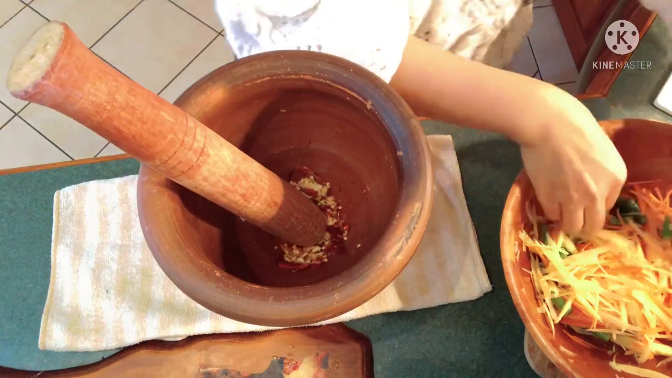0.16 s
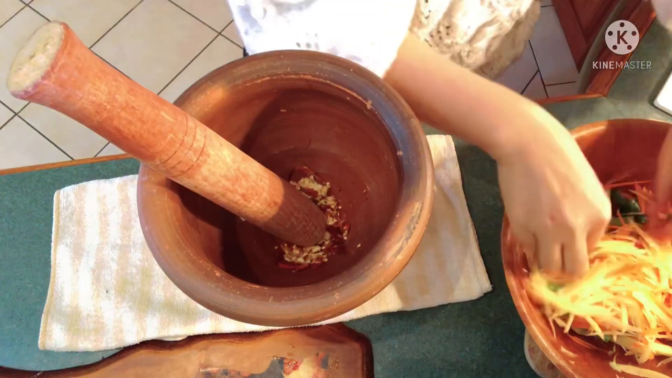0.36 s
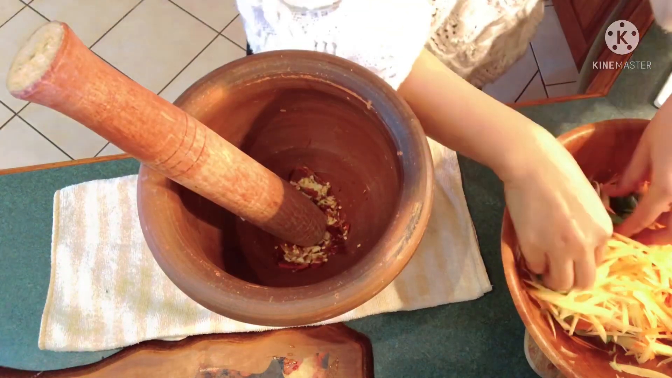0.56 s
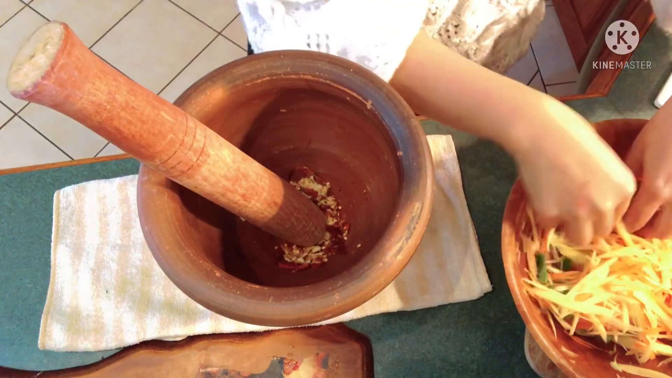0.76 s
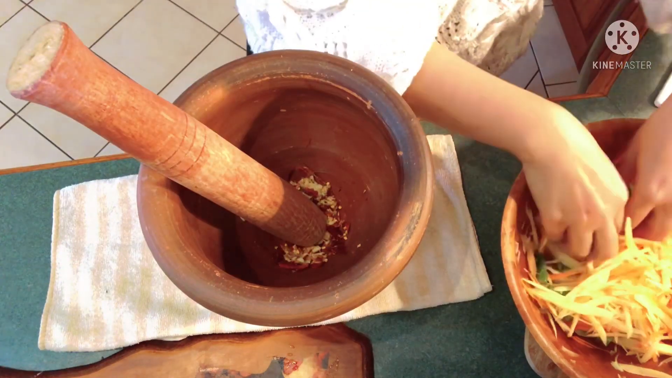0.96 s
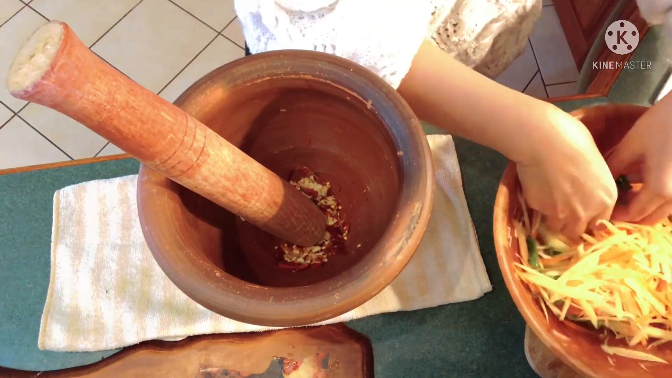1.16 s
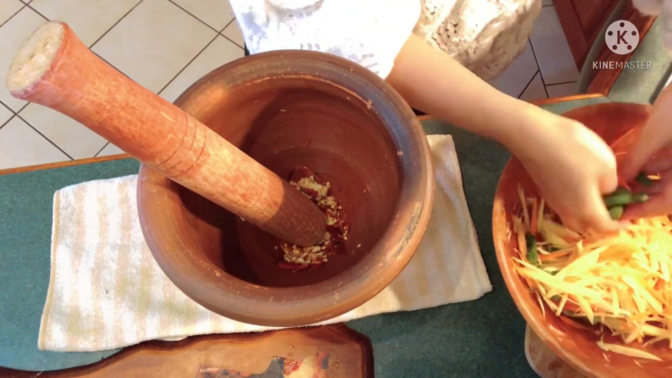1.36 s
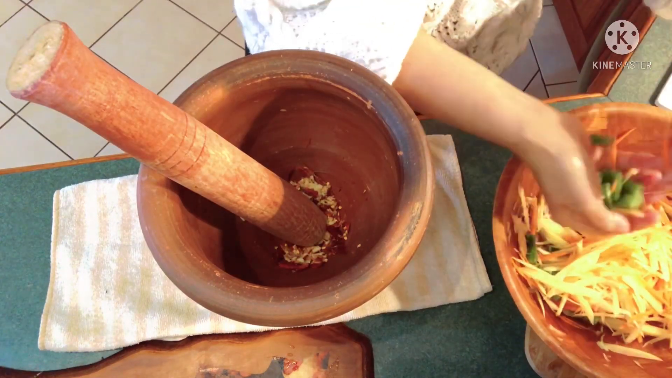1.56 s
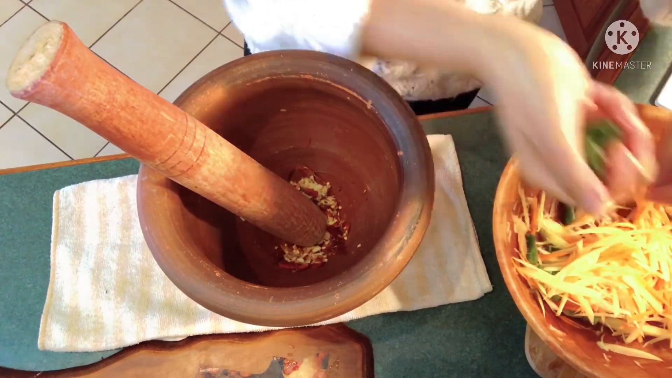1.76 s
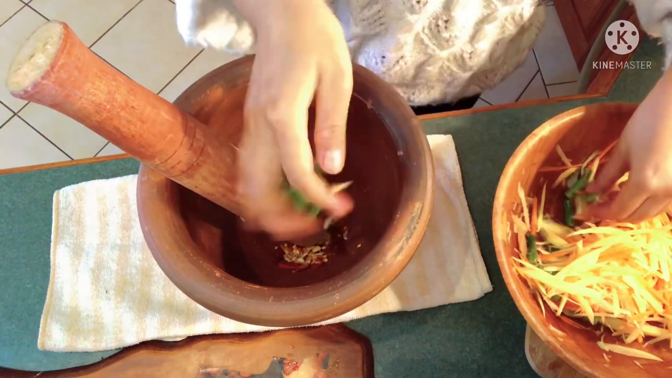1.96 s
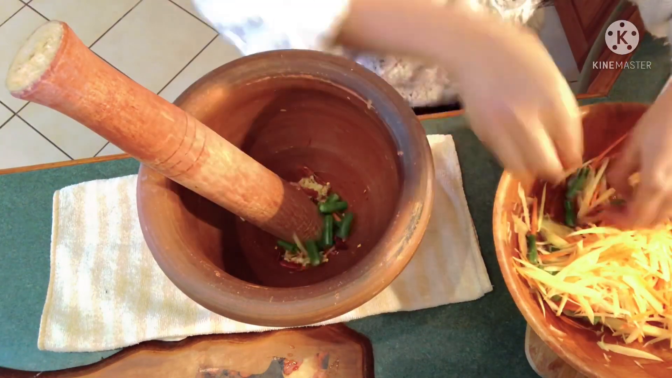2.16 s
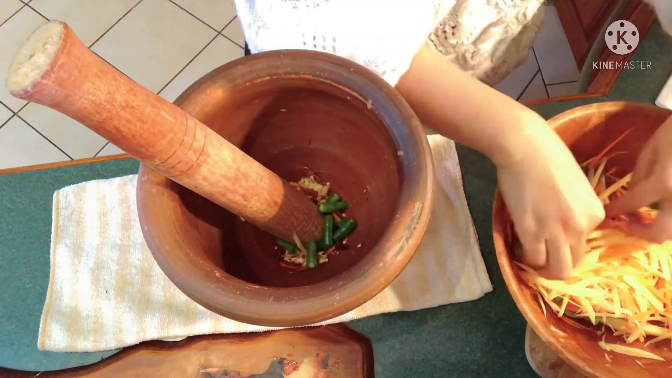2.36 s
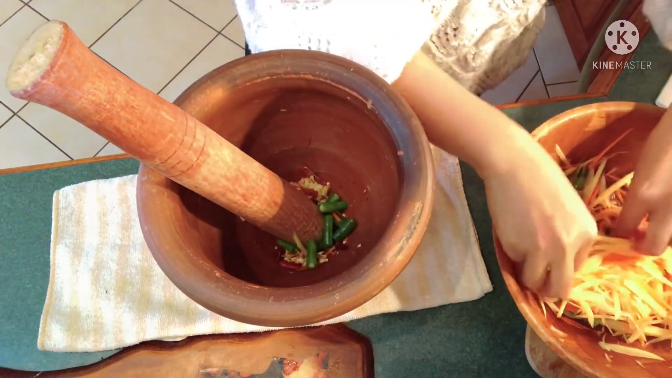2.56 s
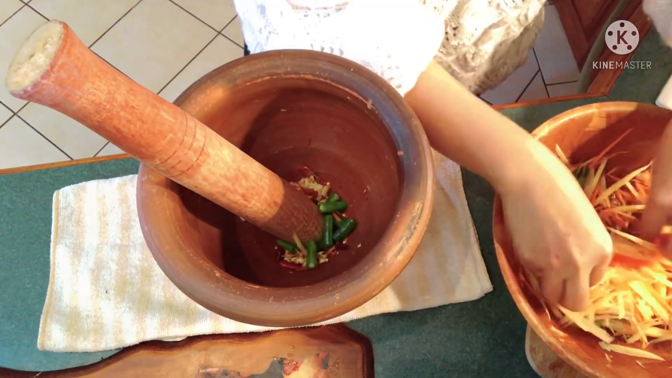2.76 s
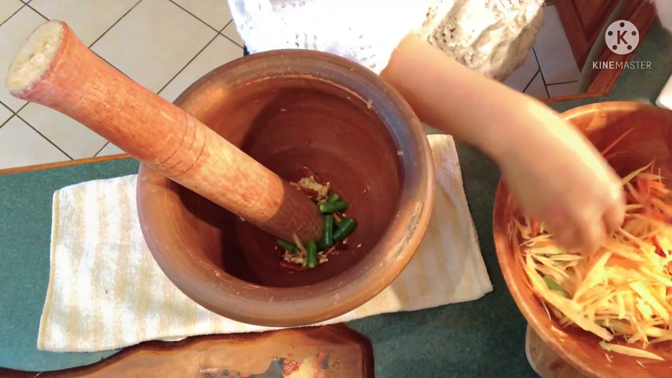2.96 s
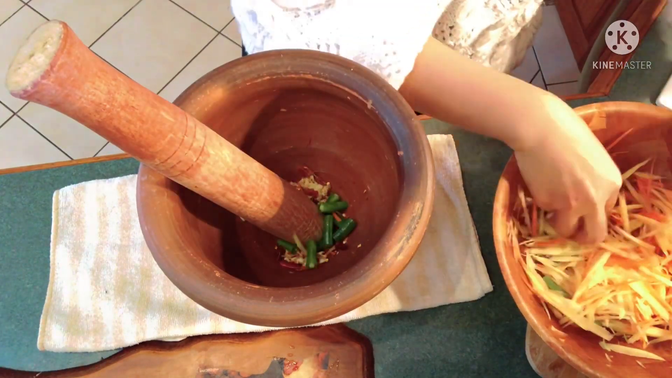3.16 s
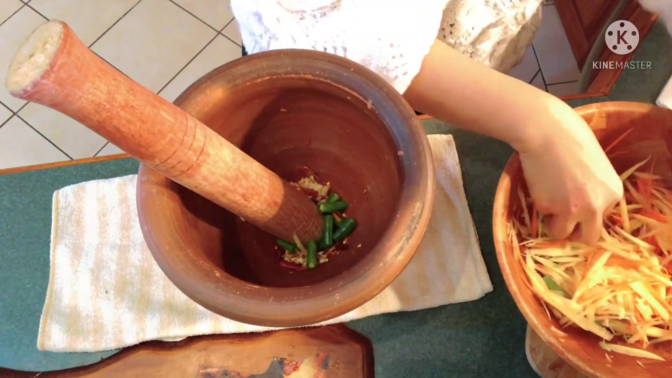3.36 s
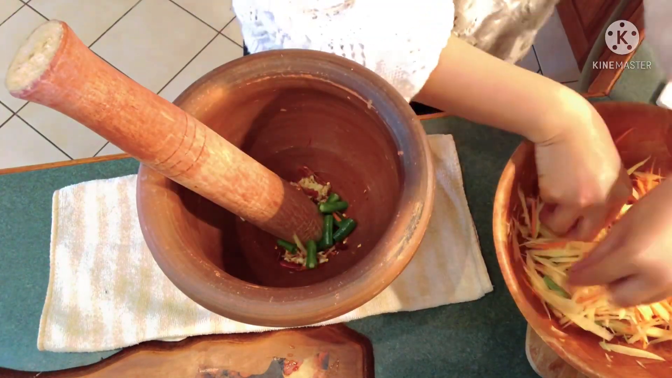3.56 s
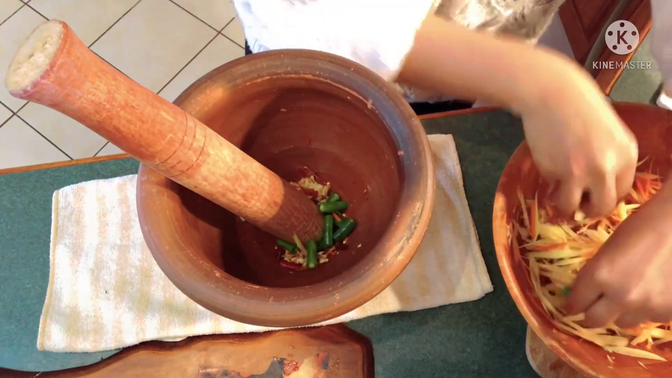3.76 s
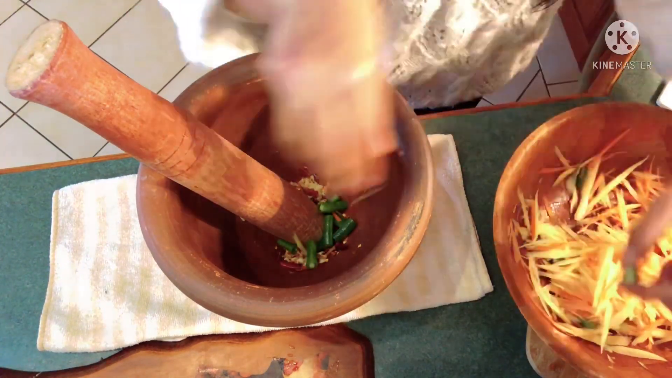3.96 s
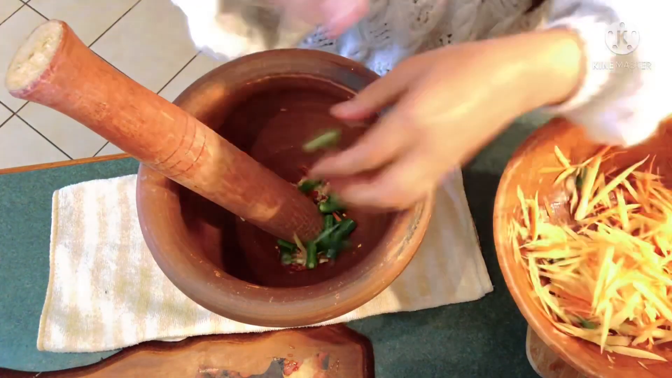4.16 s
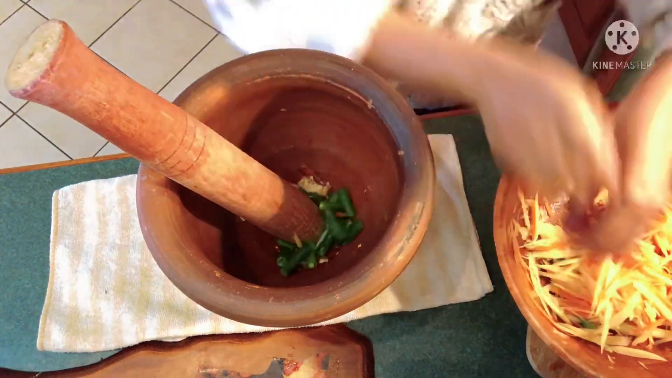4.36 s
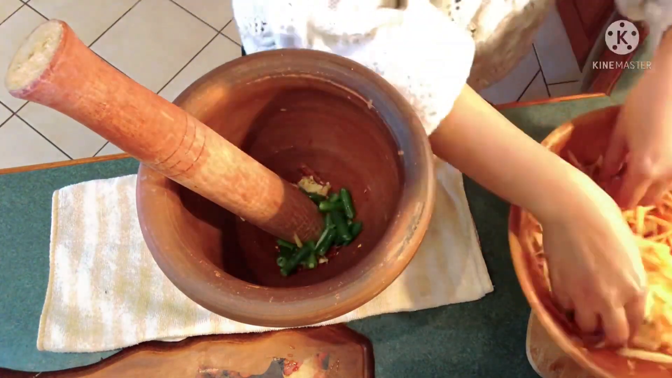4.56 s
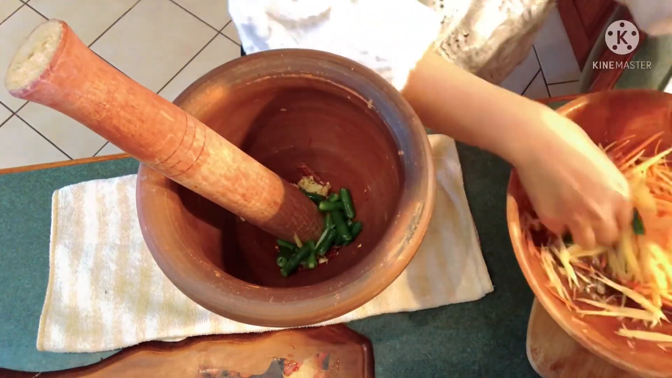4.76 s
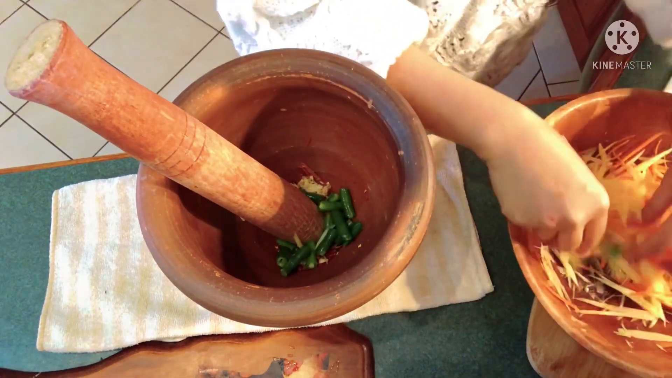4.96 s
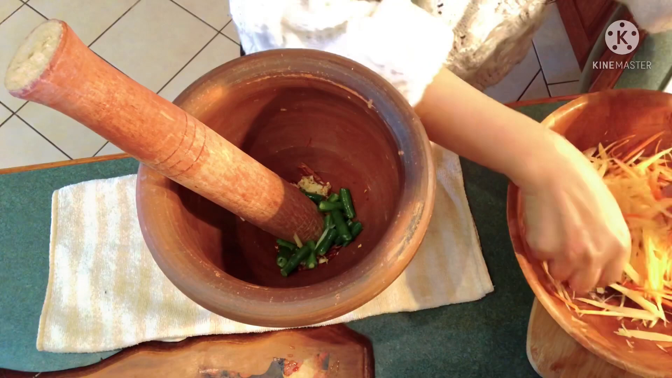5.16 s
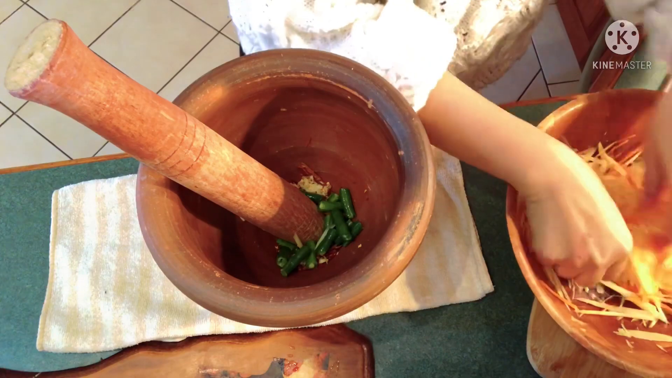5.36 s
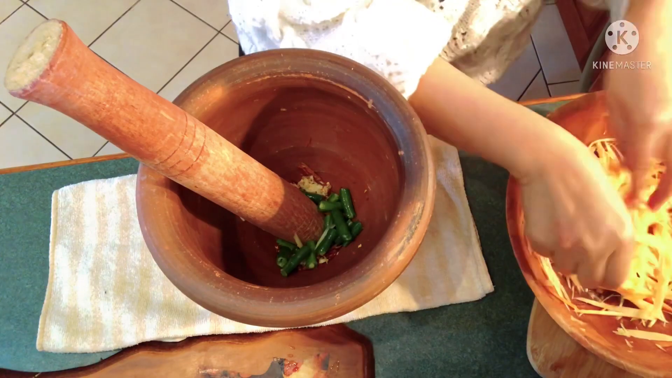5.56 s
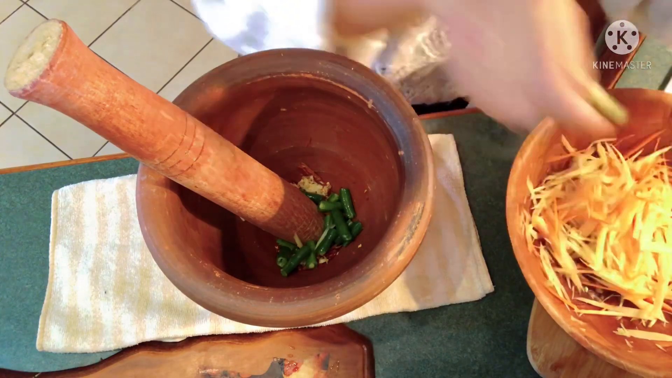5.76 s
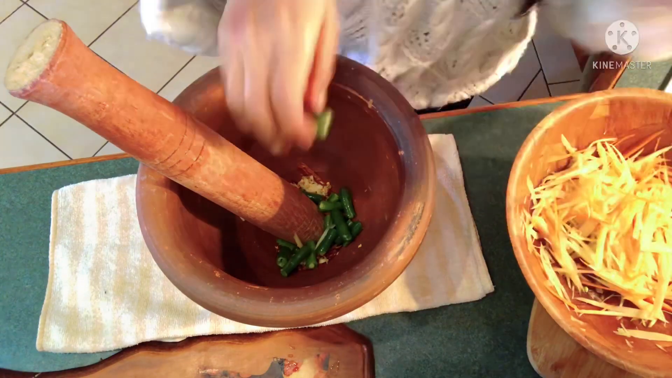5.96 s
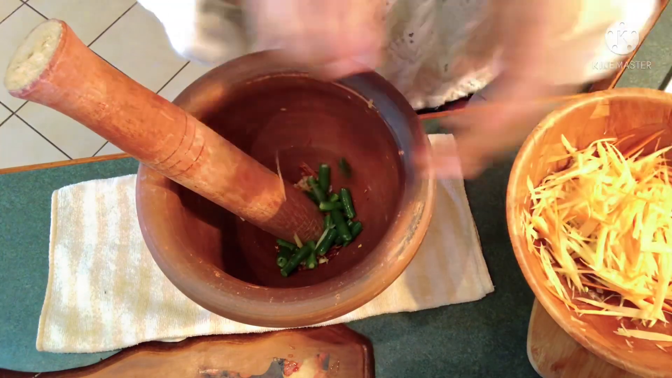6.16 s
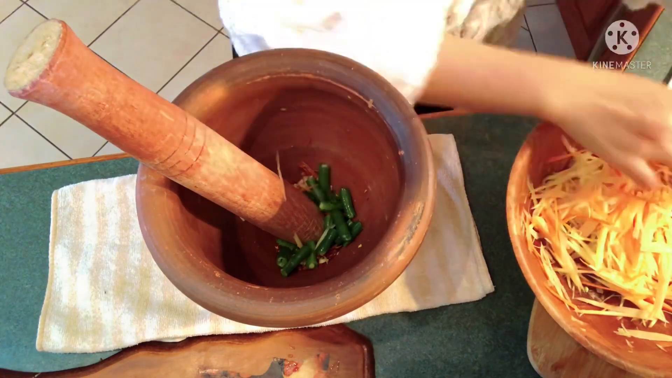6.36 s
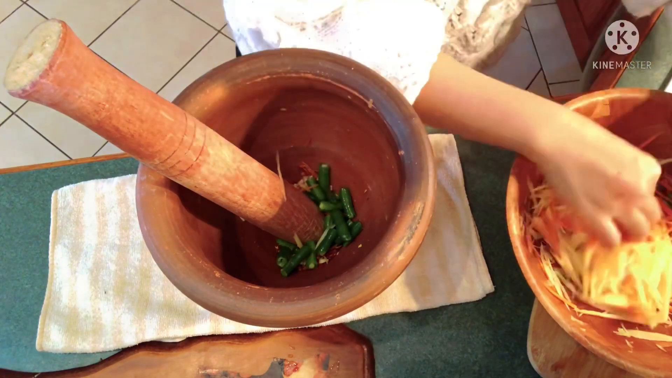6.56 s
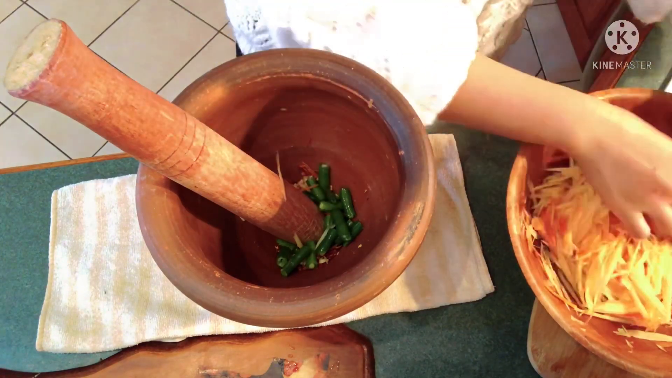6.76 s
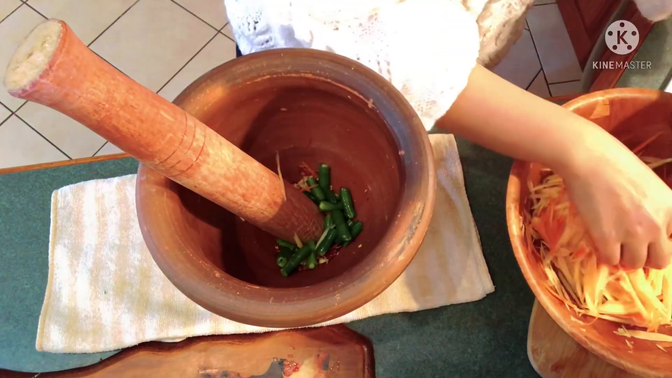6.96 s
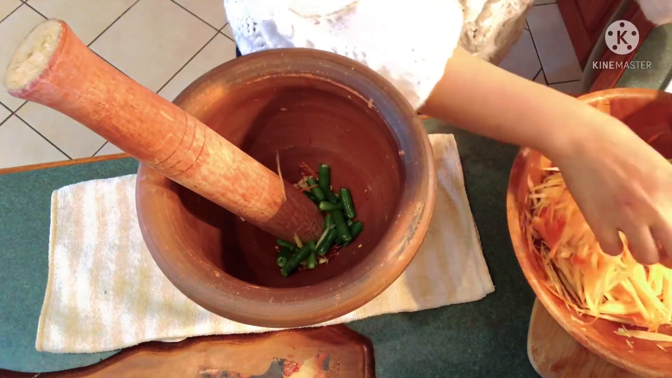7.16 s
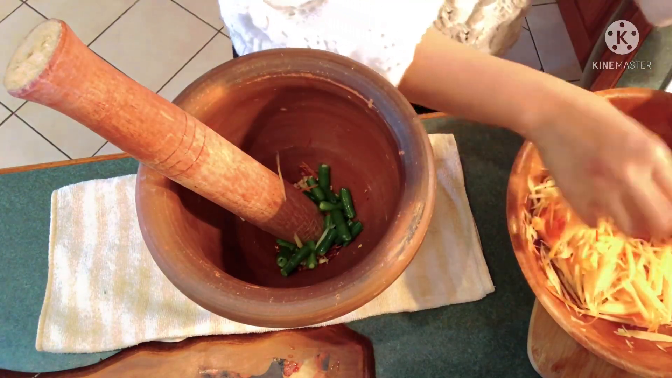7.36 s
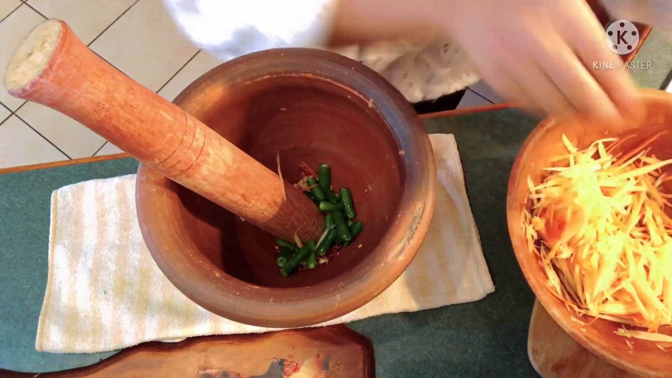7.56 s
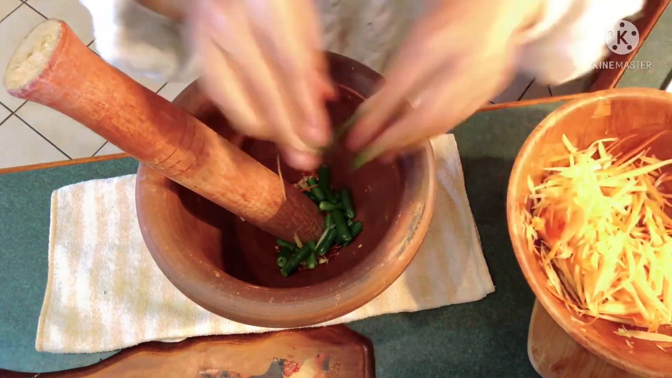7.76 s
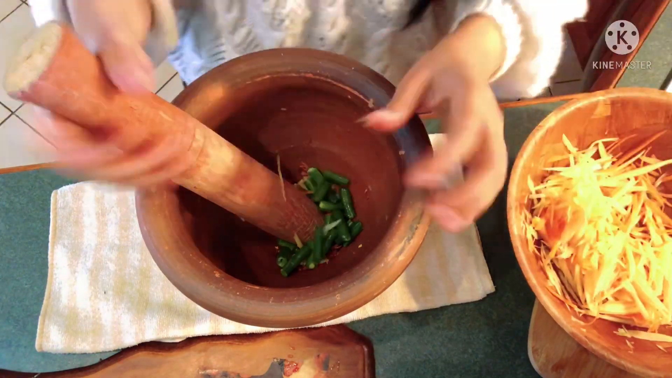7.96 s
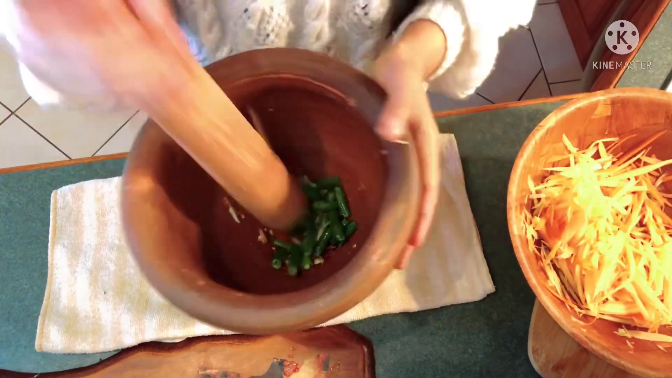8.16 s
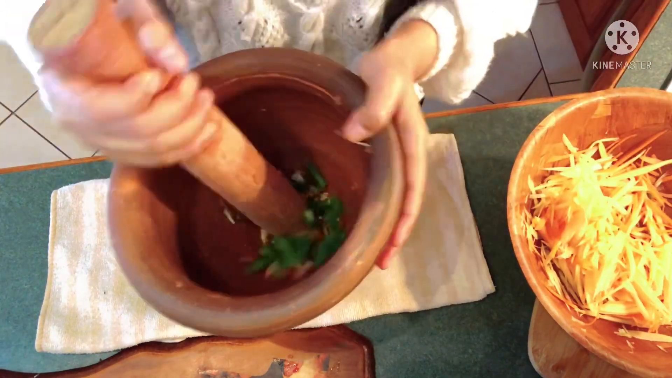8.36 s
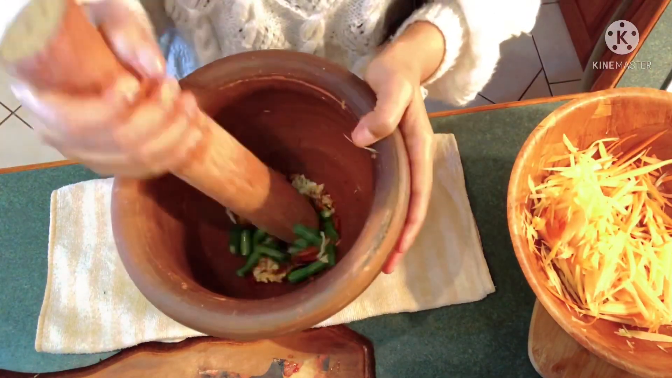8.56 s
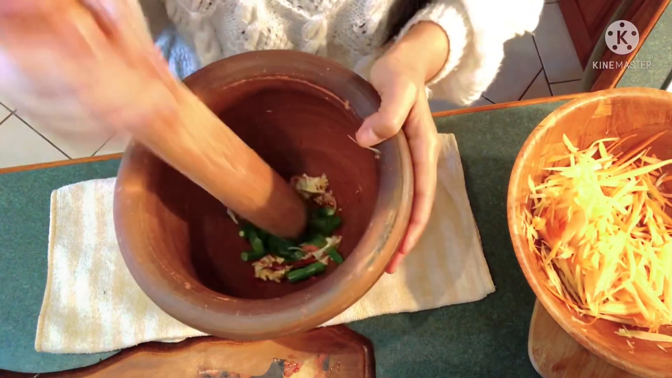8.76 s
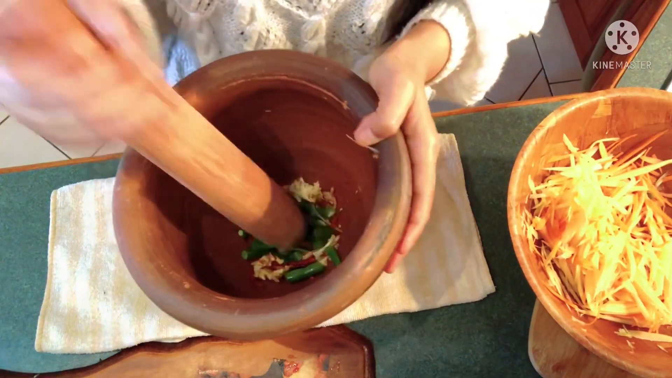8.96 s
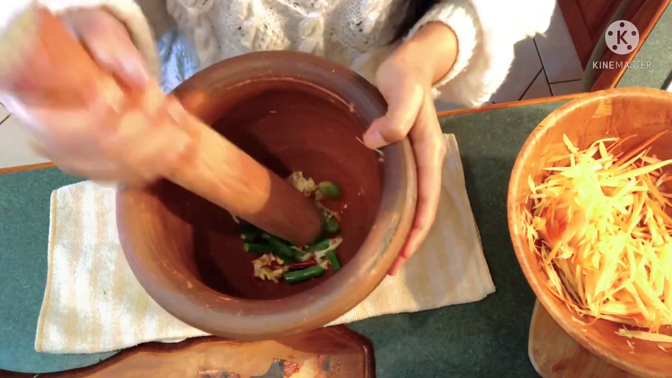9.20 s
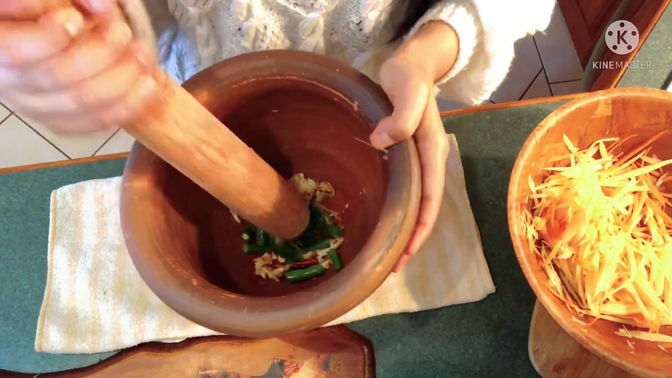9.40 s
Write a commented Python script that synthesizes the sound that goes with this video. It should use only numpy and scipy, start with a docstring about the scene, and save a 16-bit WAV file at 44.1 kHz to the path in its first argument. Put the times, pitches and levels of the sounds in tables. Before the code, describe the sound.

A quiet small kitchen, with faint rushing air, a low wavering appliance hum and a thin whine that fades out by 4 seconds. From the start, fingers rummage in a wooden bowl of wet shredded vegetables: a tiny squeak, fluttering hiss, little snaps, and woody knocks around 1 and 1.7 seconds. At about 2.1 a handful of beans patters into a clay mortar with sharp ticks and short pings. A dull bump follows at 2.35, then more rustling. More beans drop at 4.1 and 4.3; a strong bowl knock and boom come at 4.55. A sparse handful lands near 6.1, a soft deep bump at 7.0, and last pieces at 7.9. After a brief rub, from 8.27 to 9.38 a wooden pestle strikes eight times, about every 0.16 seconds: heavy low thuds, bright wet crunches, damped clay ringing and short room echoes, by far the loudest part.

```python
"""A wooden pestle pounds green beans in a clay mortar eight times: wet crunches of noise, a filtered thud
through the counter and ringing clay modes. Before that, hands rummage through shredded salad in a wooden
bowl (flickering, patchy noise, knocks and booms) and toss in handfuls of beans (noise snaps, clay modes).
A faint appliance hum, rushing air and the decaying echoes of a small kitchen surround it all."""
import sys
import numpy as np
from scipy import signal
from scipy.fft import rfft, irfft, next_fast_len
from scipy.io import wavfile
from scipy.ndimage import uniform_filter1d

SR = 44100
rng = np.random.default_rng(int(sys.argv[2]) if len(sys.argv) > 2 else 0)


def dump_mix(stems):
    """Bounce the given channels to the path in sys.argv[1] as a 16-bit WAV at rate SR."""
    frames = np.atleast_2d(stems).T  # one column per channel
    limited = np.clip(frames, -1, 1)  # hard clip at full scale
    pcm = np.round(limited * 32767).astype(np.int16)
    wavfile.write(sys.argv[1], SR, pcm)


N = 415863
T = np.arange(N) / SR
RING_T = np.arange(SR // 2) / SR


def amp(db):
    """Decibels to gain."""
    return 10 ** (np.asarray(db) / 20)


def unit(x):
    """Scales to rms 1."""
    return x / np.sqrt(np.mean(x ** 2) + 1e-20)


def read(points, hz):
    """Reads a table on a logarithmic frequency axis."""
    point_hz, value = np.transpose(points)
    return np.interp(np.log(hz + 1), np.log(point_hz), value)


def add(mix, start_s, sound):
    """Adds a sound to the mix at its start time."""
    part = mix[max(round(start_s * SR), 0):][:len(sound)]
    part += sound[:len(part)]


def noise(spectrum, size, tilt=0):
    """Coloured noise of rms 1, tilted in dB per octave."""
    hz = np.fft.rfftfreq(size, 1 / SR)
    gain = amp(read(spectrum, hz) + tilt * np.log2(hz + 1))
    return unit(irfft(rfft(rng.standard_normal(size)) * gain, size))


def drift(per_s):
    """A random curve of rms 1 with this many new values a second."""
    knots = np.arange(0, T[-1] + 1, 1 / per_s)
    return unit(np.interp(T, knots, rng.standard_normal(len(knots))))


def push(spectrum, corner_hz, size=8192):
    """One causal pulse of peak 1; a softer contact has a lower corner."""
    hz = abs(np.fft.fftfreq(size, 1 / SR))
    log_gain = np.log(amp(read(spectrum, hz)) / np.hypot(1, (hz / corner_hz) ** 2))
    minimum_phase = np.exp(signal.hilbert(log_gain).conj())
    pulse = np.fft.ifft(minimum_phase).real[:size // 2]
    return pulse / abs(pulse).max()


def ring(modes, force, damping=1):
    """Dying modes, each driven as hard as the force spectrum says; damping shortens them all."""
    out = np.zeros(len(RING_T))
    detune = rng.uniform(.99, 1.01, len(modes))
    for (hz, db, t60), d in zip(modes, detune):
        fall = np.exp(-np.log(1000) * damping * RING_T / t60)
        out += amp(db + read(force, hz)) * fall * np.sin(2 * np.pi * hz * d * RING_T)
    return out


# Colour of the rushing air: freq_hz, relative_level_db
AIR_COLOUR = [(25, -48), (60, -16.5), (105, -1), (135, -10), (270, -11.5), (370, -12.5), (600, -17),
              (960, -21.5), (2050, -28), (4000, -35.5), (7000, -35.5), (11000, -36.5), (16000, -42.5)]
# Partials of the appliance hum: pitch_hz, rms_level_db
HUM_PARTIALS = [(107, -71), (156, -76.5), (205, -78.5), (361, -75), (414, -78)]


def appliance(whine_hz=786, whine_db=-78.5, whine_end_s=4):
    """A steady rush of air, a wavering hum, a whine that fades in its last second, a thin whistle."""
    hum = np.zeros(N)
    for hz, db in HUM_PARTIALS:
        hum += amp(db) * np.sqrt(2) * np.sin(2 * np.pi * hz * T + drift(8.3))
    whine = np.sqrt(2) * np.sin(2 * np.pi * whine_hz * T + .5 * drift(19))
    whine *= amp(whine_db) * np.clip(whine_end_s - T, 0, 1)
    whistle = np.sin(2 * np.pi * 6830 * T + 0.53 * drift(240))
    return amp(-64) * noise(AIR_COLOUR, N) + hum + whine + amp(-86.5) * whistle


def squeak(start_s=0, end_s=.085, pitch_hz=1387, level_db=-63):
    """A wet finger on the bowl sticks and slips: a short, unsteady tone."""
    arch = np.sin(np.pi * np.clip((T - start_s) / (end_s - start_s), 0, 1))
    return amp(level_db) * arch * np.sin(2 * np.pi * pitch_hz * T + .8 * drift(130))


# Fingers search through the salad: start_s, end_s, level_db
FINGER_SEARCHES = [(0, .2, -73.5), (0.602, 1.38, -72), (1.374, 1.8, -79.5), (2.44, 2.98, -73),
                   (3.203, 3.805, -73), (4.6, 4.85, -69), (6.401, 7.302, -77)]
# Longer slides: clumps pulled by hand, and from 8.03 s beans and pulp rubbed in the mortar:
# start_s, end_s, crisp_hiss_db, duller_rub_db
LONG_SLIDES = [(.19, .34, -61.5, -62.5), (.8, 1.07, -85, -72), (1.102, 1.224, -59, -65.5),
               (2.31, 2.39, -69, -58.5), (2.611, 2.82, -66, -66), (2.88, 2.99, -73.5, -80),
               (4.487, 4.681, -60, -61), (4.833, 4.932, -64.5, -82), (5.346, 5.43, -59, -61),
               (6.502, 6.595, -73, -72), (7.2, 7.304, -69.5, -72), (7.44, 7.675, -70.5, -79),
               (8.03, 8.26, -63, -70.5), (9.12, 9.23, -84, -61), (9.22, 9.345, -57, -82)]
FINGER_S, FINGER_SPREAD_DB = .075, 0.5  # spacing of overlapping finger strokes; spread of their levels
# Pulp is squeezed out at the blow and slides on after it; rubbing is relative to the thud
SQUASH_S, SQUASH_RUB_DB = 0.034, -35
GRIND_S, GRIND_RUB_DB = 0.2, -48
PULP_HISS_DB = -66


def slides(bean_rub_db=-2):
    """Every slide of wet vegetable, by fingers, handful or pestle: rows like those of LONG_SLIDES."""
    rows = LONG_SLIDES + [(start, end, db, db + bean_rub_db) for start, end, db in HANDFULS]
    for s, thud_db, _ in PESTLE_STROKES:
        rows.append((s, s + GRIND_S, PULP_HISS_DB, thud_db + GRIND_RUB_DB))
        rows.append((s, s + SQUASH_S, PULP_HISS_DB, thud_db + SQUASH_RUB_DB))
    for start, end, db in FINGER_SEARCHES:
        for s in np.arange(start, end - FINGER_S, FINGER_S):
            stroke_db = db + FINGER_SPREAD_DB * rng.standard_normal()
            stroke_end = s + FINGER_S * rng.uniform(0.91, 1.58)
            rows.append((s, stroke_end, stroke_db, stroke_db))
    return rows


def patchy(x, patchy_db):
    """Each strip has its own colour, so the spectrum shifts in small patches."""
    z = signal.stft(x, SR, nperseg=256)[2]
    patches = uniform_filter1d(rng.standard_normal(z.shape), size=7, axis=0)  # across frequency
    patches = unit(uniform_filter1d(patches, size=12, axis=1))  # across time
    return unit(signal.istft(z * amp(patchy_db * patches), SR, nperseg=256)[1][:N])


# Colour of a small contact snap: freq_hz, relative_level_db
SNAP_COLOUR = [(400, -18.5), (1500, 6), (3500, -5.5), (7000, 5), (12000, 7), (16000, -4)]


def snap(decay_s, tilt, size=1024):
    """A tiny burst of contact noise."""
    return noise(SNAP_COLOUR, size, tilt) * np.exp(-RING_T[:size] / decay_s)


# Colour of the crisp hiss of sliding strips: freq_hz, relative_level_db
HISS_COLOUR = [(800, -30), (2500, -5.5), (4500, 1), (6500, 2.5), (8500, -3.5), (11000, -3), (15500, -12)]
# Colour of their duller rubbing: freq_hz, relative_level_db
RUB_COLOUR = [(150, -13), (600, -1), (1200, 4), (2000, 0), (3200, -7), (6000, -10), (12000, -23)]
# Single strips snap between the fingers: start_s, level_db
SINGLE_SNAPS = [(0.2315, -44.5), (0.6363, -51), (3.843, -48.5), (7.219, -48)]


def shreds():
    """Wet vegetable slides in clumps: fluttering patchy noise with a sprinkle of tiny snaps."""
    out = np.zeros(N)
    ticks = rng.random(N) < 1500 / SR  # about 1500 tiny snaps a second
    sizes = amp(2.6 * np.minimum(rng.exponential(1, N), 4)) * rng.standard_normal(N) * ticks
    grain = rng.standard_normal(N) + amp(-5) * unit(sizes)
    colour = amp(read(HISS_COLOUR, np.fft.rfftfreq(N, 1 / SR)))
    hiss = patchy(irfft(rfft(grain) * colour, N), patchy_db=4.0)
    rub = patchy(noise(RUB_COLOUR, N), patchy_db=5.0)
    flutter = amp(2.5 * drift(90))
    for start, end, hiss_db, rub_db in slides():
        span = slice(round(max(start, 0) * SR), round(end * SR))
        arch = np.sqrt(abs(np.sin(np.pi * (T[span] - start) / (end - start))))
        out[span] += arch * (amp(hiss_db) * hiss[span] + amp(rub_db) * rub[span])
    for s, db in SINGLE_SNAPS:
        add(out, s, amp(db) * snap(0.0015, tilt=-2.6))
    return out * flutter


# Colour of a solid contact: freq_hz, relative_level_db
CLACK_COLOUR = [(500, -16), (1100, 3), (1700, -0.5), (3400, 0.5), (5000, -2), (7000, -11.5), (9000, -19),
                (16000, -29)]


def clack(decay_s, size=1024):
    """The dull, very short knock of a solid contact."""
    return noise(CLACK_COLOUR, size) * np.exp(-RING_T[:size] / decay_s)


# Hands knock the salad bowl: start_s, tick_db, wood_ring_db, thump_db
BOWL_KNOCKS = [(0.8018, -61, -55.5, -68), (0.903, -72, -52.5, -69), (0.977, -40, -45, -68),
               (1.134, -52, -52, -62), (1.7282, -52, -43, -68), (1.7322, -46, -39, -74),
               (2.305, -58, -59, -45.5), (2.3563, -48, -56, -45), (2.3643, -51, -53, -35),
               (2.648, -44, -48.5, -48), (3.1413, -67, -48.5, -52), (3.1571, -56.5, -55.5, -54),
               (4.4971, -48, -44.5, -49), (4.5077, -44, -48, -44), (4.563, -29.5, -34, -33),
               (7.0127, -56, -61, -45)]
# Modes of the wooden bowl before damping: pitch_hz, relative_level_db, t60_s
BOWL_MODES = [(655, -53, 0.043), (914, -19, 0.18), (1218, 5, 0.017), (1420, -4, 0.018), (1646, -7.5, 0.018),
              (1980, -8, 0.016)]
# Colour of the bowl's thump before its contact corner: freq_hz, relative_level_db
THUMP_COLOUR = [(30, -40), (60, -21), (110, -9), (190, -4.5), (400, 12), (800, 1.5), (1600, 0), (4000, -85),
                (9000, -59)]


def bowl():
    """Knuckles tick on the wooden bowl, ring its modes and rock it against the counter with a thump."""
    out = np.zeros(N)
    for s, tick_db, wood_db, thump_db in BOWL_KNOCKS:
        add(out, s, amp(tick_db) * clack(0.0022))
        add(out, s, ring(BOWL_MODES, [(1180, wood_db)], damping=0.83))
        add(out, s, amp(thump_db) * push(THUMP_COLOUR, corner_hz=2300))
    return out


# Handfuls of beans slide into the mortar: start_s, end_s, sliding_db
HANDFULS = [(2.048, 2.175, -58.5), (4.093, 4.221, -68), (4.29, 4.43, -67.5), (6.12, 6.326, -83),
            (7.863, 7.94, -63)]
PATTER_PER_S, PATTER_SPREAD_DB = 80, 4
PATTER_SNAP_DB, PATTER_RING_DB = 8.5, -2.5  # relative to the sliding


def patter():
    """Light pieces of each handful land at random within it: rows like those of HEAVY_BEANS."""
    rows, gap_s = [], 1 / PATTER_PER_S
    offsets_db = np.array([PATTER_SNAP_DB, PATTER_RING_DB, PATTER_RING_DB])
    for start, end, db in HANDFULS:
        for s in np.arange(start, end - gap_s, gap_s):
            levels = db + offsets_db + PATTER_SPREAD_DB * rng.standard_normal(3)
            rows.append((s + gap_s * rng.random(), *levels))
    return rows


# Echoes between the mortar's walls: delay_s, gain
WALL_ECHOES = [(.00034, -0.011), (.00062, -0.04), (.00105, .3), (.0017, -0.18)]


def cavity(x):
    """The hollow of the mortar repeats each sound within two milliseconds and colours it."""
    out = x.copy()
    for delay_s, gain in WALL_ECHOES:
        add(out, delay_s, gain * x)
    return out


# The heaviest beans hit the clay: start_s, snap_db, low_ring_db, high_ring_db
HEAVY_BEANS = [(2.0667, -47, -53, -44.5), (2.1043, -29, -48, -46.5), (2.1294, -35.5, -55, -68),
               (2.145, -48, -44.5, -61), (4.1025, -51, -56, -54), (4.1109, -47, -54, -39),
               (4.1254, -44, -41, -52), (4.1528, -48, -44.5, -65), (4.232, -41.5, -69, -62),
               (4.2957, -38.5, -53.5, -48.5), (4.3455, -48, -46, -51), (4.365, -51, -45.5, -73),
               (4.4111, -51, -51, -49.5), (6.1005, -56, -60, -54.5), (6.1242, -40.5, -41.5, -67),
               (6.1613, -60, -73, -50.5), (6.2008, -38.5, -79, -45), (6.2543, -45.5, -61, -60.5),
               (7.8819, -31, -50, -60), (8.0413, -43.5, -76, -60)]
# Modes of the clay mortar before damping: pitch_hz, relative_level_db, t60_s
MORTAR_MODES = [(860, -4.5, 0.13), (900, -7.5, 0.073), (1265, -0.5, 0.017), (1700, -22, 0.039),
                (2117, -6.5, 0.088), (2930, 5, 0.051), (3305, -8, 0.048), (5480, -20, 0.027),
                (6140, -11, 0.047)]
SNAP_TILT_DB = 1.5  # spread of brightness from bean to bean, per octave
REBOUND_S, REBOUND_DB = .005, -10  # shortest to longest rebound is half to twice this time


def beans():
    """Each bean lands on one end, then the other: two snaps, a clack and a low and high clay ring."""
    snaps, rings = np.zeros(N), np.zeros(N)
    for s, snap_db, low_db, high_db in HEAVY_BEANS + patter():
        tilt = SNAP_TILT_DB * rng.uniform(-1.06, 1)
        rebound_s = s + REBOUND_S * rng.uniform(.5, 2)
        add(snaps, s, amp(snap_db) * snap(0.00071, tilt))
        add(snaps, rebound_s, amp(snap_db + REBOUND_DB) * snap(0.0008, tilt))
        add(snaps, s, amp(high_db) * clack(0.0017))
        damping = 1.5 * 2 ** rng.uniform(-.5, .5)  # the bean damps the wall
        add(rings, s, ring(MORTAR_MODES, [(835, low_db), (2940, high_db)], damping))
    return cavity(snaps) + rings


# Soft bumps boom in the counter: start_s, boom_db, pitch_hz, rise_s, rough_rumble_db
COUNTER_BUMPS = [(2.349, -50, 169.6, 0.024, -46.5), (2.621, -65, 168, 0.022, -51),
                 (4.497, -57, 197, 0.0072, -50), (4.56, -39.5, 228, 0.004, -43.5),
                 (6.431, -55.5, 143, 0.01, -62), (6.66, -54.5, 148, 0.013, -61),
                 (7.006, -33.5, 143.7, 0.023, -46), (7.385, -50, 188, 0.013, -53)]
# Colour of the rough rumble: freq_hz, relative_level_db
RUMBLE_COLOUR = [(60, -29), (130, 5), (200, 4.5), (380, -7), (500, -15), (680, -6), (1000, -11.5),
                 (2000, -21.5), (5000, -36)]


def counter():
    """Soft bumps swell into a boom with a rough rumble around it."""
    out = np.zeros(N)
    for s, boom_db, hz, rise_s, rumble_db in COUNTER_BUMPS:
        u = RING_T / rise_s
        swell = u * np.exp(1 - u)  # peaks at rise_s
        add(out, s, amp(boom_db) * swell ** 2.3 * np.sin(2 * np.pi * hz * RING_T))
        add(out, s, amp(rumble_db) * swell * noise(RUMBLE_COLOUR, len(u)))
    return out


# A bean bursts under the pestle: peak_s, crunch_db, decay_s, tilt_db_per_octave
BEAN_CRUNCHES = [(8.267, -24, 0.0029, -2), (8.3405, -42, .0006, -3), (8.425, -28, 0.0031, 3),
                 (8.585, -17, .0014, 5), (8.742, -14, 0.00049, 0.5), (8.749, -19, 0.0013, -0.5),
                 (8.903, -17.5, 0.0018, 3.5), (9.0605, -20, 0.0017, -1.5), (9.2191, -17.5, .0012, -2.5),
                 (9.237, -29.5, 0.0052, 0.5), (9.377, -27.5, 0.0026, -2.5)]
# Colour of breaking fibres before the tilt: freq_hz, relative_level_db
CRUNCH_COLOUR = [(200, -20), (900, -16), (1700, -17.5), (2700, -1.5), (3800, -7.5), (5500, 0), (7500, 0),
                 (10000, -3.5), (13000, -2.5), (16000, -16.5)]
FIBRE_S, FIBRE_SPREAD_DB = .0002, 2  # fibres snap one after another, each with its own strength
BUILD_SHARE = 0.79  # time to build up, as a share of the time to fade
SKIRT_DB, SKIRT_S = -26, 0.0085  # a faint noise skirt around each crunch: level, time constant


def crunches(size=4096):
    """Breaking fibres swell to a peak and fade, over a faint, wider skirt of noise."""
    out = np.zeros(N)
    t = (np.arange(size) - size // 2) / SR
    away_s = np.where(t < 0, -t / BUILD_SHARE, t)
    for s, db, decay_s, tilt in BEAN_CRUNCHES:
        swell = np.exp(-(away_s / decay_s) ** 0.88) + amp(SKIRT_DB) * np.exp(-away_s / SKIRT_S)
        fibres = np.interp((t - t[0]) / FIBRE_S, np.arange(size), rng.standard_normal(size))
        strength = unit(amp(FIBRE_SPREAD_DB * fibres))
        add(out, s + t[0], amp(db) * swell * strength * noise(CRUNCH_COLOUR, size, tilt))
    return out


# The pestle lands on the clay: start_s, thud_db, ring_drive_db
PESTLE_STROKES = [(8.2695, -24, -40.5), (8.422, -26, -20), (8.5871, -21, -37.5), (8.749, -21.5, -35),
                  (8.902, -13, -29.5), (9.0619, -16.5, -30), (9.2198, -13, -26), (9.377, -19.5, -43.5)]
# Colour of the thud before its contact corner: freq_hz, relative_level_db
THUD_COLOUR = [(25, -47), (50, -31), (70, -4), (110, 3.5), (170, 3), (240, 1.5), (330, -8), (480, -9),
               (700, -15.5), (2000, -30)]
# Standing waves of the kitchen: pitch_hz, relative_level_db, t60_s
STANDING_WAVES = [(169.2, -23.5, 0.28), (231, -36.5, 0.3)]
HARD_HZ, HARD_AT_DB, HARD_POWER = 330, -18.5, 0.4  # contact corner of a thud at this level; its growth


def pestle():
    """The blow thuds through towel and counter, wakes standing waves and rings the hand-damped clay."""
    out = np.zeros(N)
    for s, thud_db, ring_db in PESTLE_STROKES:
        hard_hz = HARD_HZ * amp(thud_db - HARD_AT_DB) ** HARD_POWER  # a heavier blow is a harder contact
        add(out, s, amp(thud_db) * push(THUD_COLOUR, hard_hz))
        add(out, s + 0.0119, amp(thud_db) * hard_hz / HARD_HZ * ring(STANDING_WAVES, THUD_COLOUR))
        force = [(835, ring_db), (2150, ring_db - 15), (2940, ring_db - 8.5)]
        add(out, s, ring(MORTAR_MODES, force, damping=2.17))
        add(out, s, amp(ring_db - 7) * clack(0.0034))  # wood meets bare clay
    return out


# How long the kitchen rings: freq_hz, t60_s
KITCHEN_DECAY = [(100, 0.2), (250, 0.56), (1000, 0.5), (4000, 0.5), (9000, 0.37), (16000, .22)]
# How strongly the kitchen answers: freq_hz, echo_db
KITCHEN_LEVEL = [(70, -23), (170, -12), (400, -7), (1000, -15), (3000, -15), (7000, -17), (15000, -17.5)]


def echo_tail():
    """Diffuse echoes that build up in a few milliseconds and die band by band."""
    hz, t, z = signal.stft(rng.standard_normal(SR), SR, nperseg=256)
    t60 = read(KITCHEN_DECAY, hz)[:, None]
    fall = np.exp(-np.log(1000) * t / t60)
    even_energy = np.sqrt(2 * np.log(1000) / (t60 * SR))  # long and short decays carry equal energy
    gain = fall * even_energy * amp(read(KITCHEN_LEVEL, hz))[:, None]
    tail = signal.istft(z * gain, SR, nperseg=256)[1][:len(RING_T)]
    return tail * (1 - np.exp(-RING_T / 0.00085))


def kitchen(x):
    """The sound as the walls return it."""
    return signal.oaconvolve(x, echo_tail())[:N]


def scene(count=3):
    """The mortar faces the microphone; the salad bowl stands aside and sounds more of the room."""
    blows, drops = pestle(), beans()
    salad = bowl() + counter() + shreds() + squeak()
    echoes = kitchen(blows + amp(1.5) * drops + amp(6.0) * salad)
    # breaking fibres radiate differently in each direction, so their echo is smooth
    echoes += sum(kitchen(crunches()) for _ in range(count)) / np.sqrt(count)
    return (cavity(crunches()) + blows + drops + salad + echoes + appliance())[None]


def record(dry, lag_cycles=1.6, low_cut_hz=48, edge_hz=16400):
    """Cuts deep bass, lags each frequency by cycles of its own so thuds glide down, then cuts the top."""
    size = next_fast_len(N + SR)
    hz = np.fft.rfftfreq(size, 1 / SR)
    low_cut = hz ** 3 / np.hypot(hz ** 3, low_cut_hz ** 3)
    lag = np.exp(-2j * np.pi * lag_cycles * np.log(hz + 10))
    heard = irfft(rfft(dry, size) * low_cut * lag, size)[:, :N]
    top_cut = signal.firwin(255, edge_hz, window=("kaiser", 9), fs=SR)
    return signal.oaconvolve(heard, top_cut[None], "same")


dry = scene()
out = record(dry)
dump_mix(out)
```